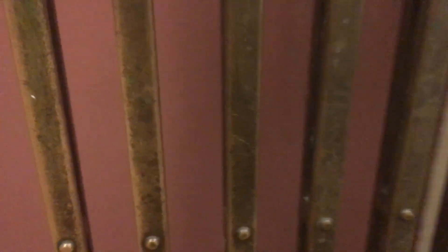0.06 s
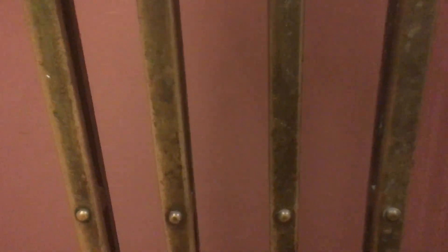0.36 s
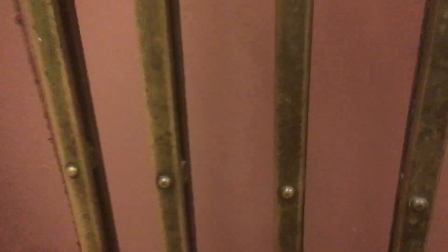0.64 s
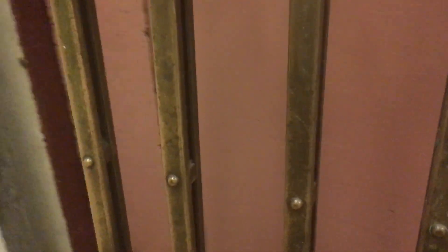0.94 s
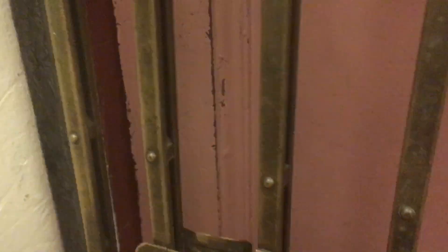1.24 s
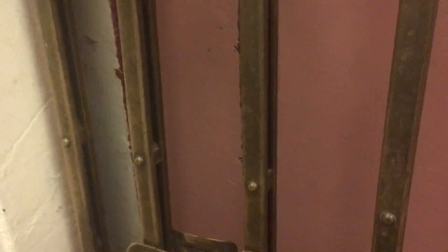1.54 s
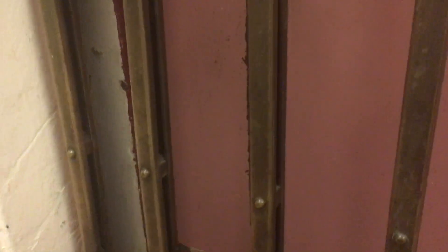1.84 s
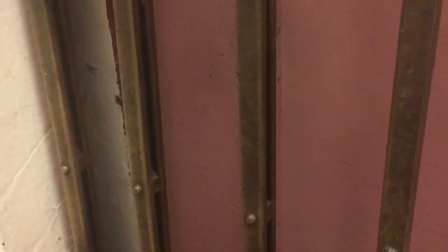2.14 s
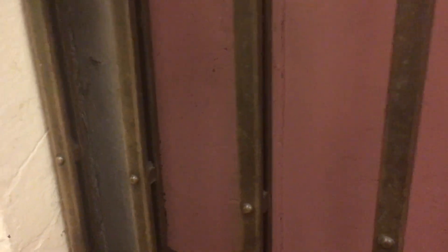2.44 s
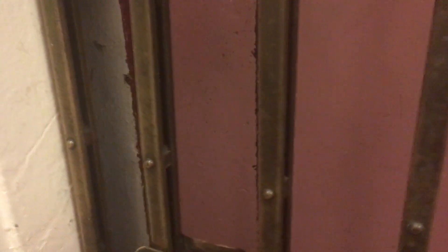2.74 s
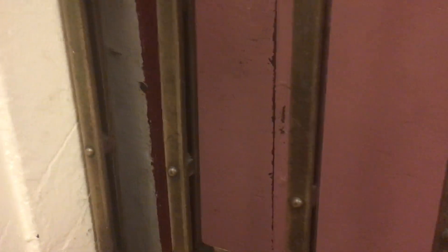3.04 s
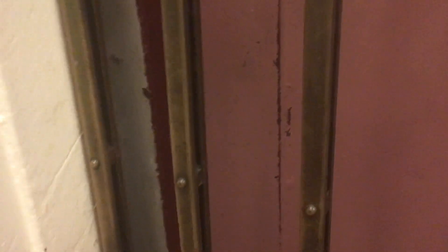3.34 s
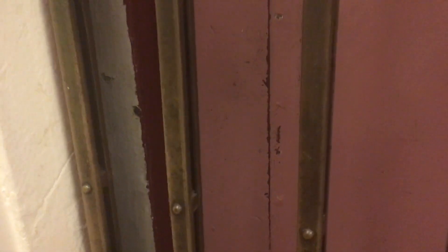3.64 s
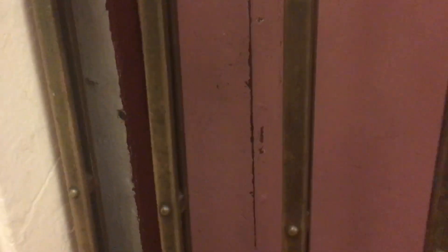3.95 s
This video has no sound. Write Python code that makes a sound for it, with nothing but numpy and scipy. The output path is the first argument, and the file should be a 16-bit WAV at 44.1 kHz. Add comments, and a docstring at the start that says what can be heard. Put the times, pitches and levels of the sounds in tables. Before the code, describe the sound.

A folding metal elevator gate rumbles and scrapes along, then its loose bars knock and click.

```python
"""Folding metal gate in a lift

The gate rolls and scrapes along its track, shaking the frame into a low rumble with a few jolts.
Dry pivots squeak and the track gives one thin squeal. As the gate comes to rest, its loose bars
go on knocking and the rivets and catch click; the small cab rings briefly after each contact."""
import sys
import numpy as np
from scipy import signal
from scipy.fft import rfft, irfft
from scipy.io import wavfile
from scipy.ndimage import uniform_filter1d

SR = 44100
rng = np.random.default_rng(int(sys.argv[2]) if len(sys.argv) > 2 else 0)


def digitize_waveform(pressure):
    """Quantize a signal to 16-bit integers and store it at the path in sys.argv[1].

    Rows of a 2-D input are taken as channels; values are limited to [-1, 1].
    """
    field = np.atleast_2d(pressure).T
    bounded = np.clip(field, -1, 1)
    quanta = np.round(bounded * 32767).astype(np.int16)
    wavfile.write(sys.argv[1], SR, quanta)


N = 176400
HIT_SAMPLES = 22050  # half a second for each hit to ring out

# Levels in the tables are relative: the functions add their own gains.
# hush of the air in the cab: f/Hz, level/dB
AIR_SPECTRUM = [(300, 6.5), (700, -6), (1500, -9), (3100, -19), (7800, -27), (15500, -10)]
# time the cab's echo takes to fade by 60 dB: f/Hz, t/s
CAB_DECAY = [(300, 0.59), (800, 0.33), (2100, 0.27), (5500, 0.19), (14600, .16)]
# low resonances of cab and gate frame: f/Hz, width/Hz, level/dB
FRAME_MODES = [(43.3, 3.1, -3.5), (63.7, 7.7, 3), (92.1, 7.8, 0), (118.3, 28, -5.5), (161.9, 11, -1.5),
               (187.7, 6.8, -3.5), (216.6, 6.6, -12.5), (245.2, 15, -15.5), (334.3, 11, -20.5),
               (424, 7.8, -25), (530, 37, -30.5)]
# strength of the rumble: t/s, level/dB
RUMBLE_LEVEL = [(0, -38), (.27, -38), (.53, -42.5), (.66, -36), (.8, -34.5), (.99, -41.5), (1.32, -37),
                (1.6, -43.5), (1.87, -50.5), (2.6, -48), (3.3, -53.5), (3.75, -49.5), (4, -57)]
# bumps on the track: t/s, level/dB, f/Hz that the push favours
JOLTS = [(0.634, -27.5, 192), (0.687, -30.5, 163), (.745, -30, 78), (1.224, -44.5, 406),
         (2.336, -46.5, 138), (2.996, -47, 440), (3.667, -49.5, 260)]
# strength of the scraping: t/s, level/dB
SCRAPE_LEVEL = [(0, -46.5), (.16, -43.5), (.28, -49), (.6, -50.5), (.69, -40), (.74, -45.5), (.84, -51.5),
                (.93, -51), (1.03, -48), (1.08, -52.5), (1.22, -45), (1.36, -50.5), (1.48, -58.5),
                (1.62, -53.5), (1.72, -62.5), (1.8, -73.5), (4, -69.5)]
# tone colour of the scraping: f/Hz, level/dB
SCRAPE_SPECTRUM = [(250, 3.5), (480, -14), (660, -13), (850, -17), (1200, -14.5), (2500, -16), (5800, -17),
                   (8500, -21), (12000, -16), (15500, -15)]
# pivot squeaks: t/s, length/s, start f/Hz, end f/Hz, level/dB, loss per harmonic/dB
SQUEAKS = [(0.302, 0.026, 5370, 5400, -47, 27), (0.308, 0.023, 2594, 2532, -40.5, 15),
           (0.32, 0.0267, 2526, 2440, -45.5, -1), (0.324, 0.026, 2763, 2626, -43.5, 10),
           (0.336, 0.026, 4940, 4600, -49, 24), (0.842, 0.056, 3360, 3590, -55, 22),
           (1.091, 0.04, 2505, 2470, -54, 20), (1.349, 0.078, 2417, 2840, -54, 5.5)]
# notes the bars ring with: f/Hz, level/dB, t/s to fade by 60 dB
BAR_MODES = [(344, -9.5, 0.45), (526.4, -12.5, 0.56), (678, -9, 0.24), (1047, -14, 0.3), (1202, -3.5, 0.25),
             (1817, -10.5, 0.2), (2170, -15, 0.12), (2840, -15.5, 0.088), (3095, -13, 0.12),
             (3560, -20, 0.11), (4470, -7.5, 0.078), (5400, -9, 0.086), (6170, -4.5, 0.036),
             (6830, -1.5, 0.035)]
# contacts that land where one of those notes swings most: t/s, f/Hz
SWEET_SPOTS = [(.661, 6121), (2.429, 2099), (2.608, 2835), (3.448, 4540), (3.5175, 4540)]
# borders of five bands, named body, clack, ring, edge and sizzle from low to high: f/Hz
BAND_EDGES = [250, 900, 2400, 4800, 7500, 16000]
# light ticks of slack links: t/s, level/dB
LINK_TICKS = [(.068, -46), (.834, -47.5), (.904, -50.5), (1.019, -52), (1.159, -61), (1.516, -52.5),
              (1.82, -69.5), (1.873, -64.5), (1.9413, -62.5), (2.209, -65), (2.263, -52.5), (2.301, -55),
              (2.512, -56.5), (2.998, -60), (3.373, -50.5)]
# tone colour of those ticks: level/dB in each of the five bands
TICK_COLOUR = [-20, -18, -1.5, -7, -1.5]
# sharp clicks of rivets and catch: t/s, then level/dB in each of the five bands
RIVET_CLICKS = [(0.495, -69, -49.5, -48, -50, -43.5), (0.631, -56, -41.5, -42, -40.5, -40),
                (0.661, -75.5, -69, -40.5, -36.5, -31), (0.761, -78, -58, -46, -49, -38),
                (1.226, -38.5, -44, -45, -43.5, -43.5), (1.605, -56, -62, -53, -54.5, -42),
                (1.651, -60, -55.5, -57, -48.5, -48), (1.704, -56, -55, -52.5, -55.5, -47),
                (2.024, -59, -67, -58.5, -52, -52), (2.338, -55.5, -52, -52, -54, -51),
                (2.345, -50.5, -54, -48, -52, -44), (2.476, -56.5, -60, -48, -60, -54.5),
                (2.608, -46.5, -43, -36.5, -45, -47), (3.5175, -104, -62.5, -45, -39.5, -34.5),
                (3.598, -75, -66, -51, -48.5, -55)]
# duller knocks of bar on bar: t/s, then level/dB in each of the lower four bands
BAR_KNOCKS = [(0.413, -56.5, -44, -39.5, -47.5), (0.638, -56, -44, -67, -65), (1.245, -41.5, -58, -63, -50),
              (1.428, -51.5, -45.5, -40, -49), (1.59, -53, -53.5, -68, -67), (1.79, -53.5, -72, -89, -85),
              (1.965, -56, -60, -73, -88), (1.987, -53.5, -53.5, -52, -68), (2.006, -58.5, -60.5, -60, -68),
              (2.278, -59, -55.5, -60, -57.5), (2.428, -50, -37, -45.5, -45.5),
              (2.558, -56, -48, -49.5, -59), (2.681, -54.5, -68, -52.5, -59.5),
              (2.961, -60, -60.5, -71, -70), (2.990, -51, -59, -62, -78), (3.192, -56, -55.5, -56.5, -74),
              (3.415, -58, -58, -66, -69), (3.448, -56.5, -61, -47, -48), (3.666, -51.5, -60, -60, -63),
              (3.696, -56, -55, -60, -70)]


def from_db(db):
    """Turn decibels into a gain."""
    return 10 ** (np.asarray(db) / 20)


def rms_one(x):
    """Scale a signal so its average strength (rms) is 1."""
    return x / np.sqrt(np.mean(x ** 2) + 1e-20)


def in_time(rows):
    """Join (time, value) rows by straight lines."""
    return np.interp(np.arange(N) / SR, *np.transpose(rows))


def at_hz(points, hz):
    """Read between (frequency, value) rows, with octaves evenly spaced."""
    f, value = np.transpose(points)
    return np.interp(np.log(np.maximum(hz, 1)), np.log(f), value)


def add(out, start_s, sound):
    """Mix a sound in at a given time."""
    i = max(int(start_s * SR), 0)
    out[i:i + len(sound)] += sound[:max(N - i, 0)]


def wander(shape, samples):
    """A random wiggle; smoothing over more samples makes it slower."""
    return rms_one(uniform_filter1d(rng.standard_normal(shape), size=samples))


def band_pass(x, low_hz, high_hz):
    """Keep what lies between two frequencies."""
    return signal.sosfilt(signal.butter(2, [low_hz, high_hz], "band", fs=SR, output="sos"), x)


def coloured(noise, spectrum):
    """Give a noise a tone colour and take out the bass."""
    gains = from_db(at_hz(spectrum, np.arange(N // 2 + 1) * SR / N))
    return rms_one(band_pass(irfft(rfft(noise) * gains, N), 250, 16000))


def resonate(x, hz, width_hz):
    """Ring at one pitch; the narrower the width, the longer the ring."""
    r = np.exp(-np.pi * width_hz / SR)
    feedback = [1, -2 * r * np.cos(2 * np.pi * hz / SR), r * r]
    return signal.lfilter(np.array([1, 0, -1]) * (1 - r * r) / 2, feedback, x)


def cab_air(level_db):
    """The air in the cab is a faint, steady hush."""
    return from_db(level_db) * coloured(rng.standard_normal(N), AIR_SPECTRUM)


def cab_echo(x, echo_db):
    """The close walls add a short wash of reflections."""
    t = np.arange(HIT_SAMPLES) / SR
    echo = rng.standard_normal(len(t)) * from_db(-60 * t / at_hz(CAB_DECAY, 7500)) * (t > .003)
    return x + from_db(echo_db) * signal.fftconvolve(x, echo / np.linalg.norm(echo))[:N]


def wall_panel(x):
    """A wall panel picks up the sound and hums along."""
    return x + from_db(2.5) * resonate(x, hz=654.5, width_hz=22)


def frame_ring(force, hz, width_hz):
    """One low resonance of the frame, filtered twice to keep it narrow."""
    return rms_one(resonate(resonate(force, hz, width_hz), hz, hz / 3))


def rumble(level_db, tilt_per_octave):
    """Rolling shakes the frame; its upper resonances die away first as the gate slows."""
    effort_db, out = in_time(RUMBLE_LEVEL), 0
    for hz, width, db in FRAME_MODES:
        shake = frame_ring(rng.standard_normal(N + SR), hz, width)[SR:]  # skip the build-up
        shake /= np.sqrt(uniform_filter1d(shake ** 2, size=12000))  # even out slow swells
        octaves = np.log2(hz / FRAME_MODES[1][0])
        tilt_db = tilt_per_octave * octaves * (effort_db - RUMBLE_LEVEL[0][1])
        out = out + from_db(db + tilt_db) * shake
    low_cut = signal.butter(2, 32, "high", fs=SR, output="sos")
    return from_db(effort_db + level_db) * signal.sosfilt(low_cut, out)


def jolts(push_s, level_db, octave_loss_db=8.5):
    """A bump on the track pushes the frame for a moment and lets it boom."""
    out, t = np.zeros(N), np.arange(HIT_SAMPLES) / SR
    for start_s, db, push_hz in JOLTS:
        boom = 0
        for hz, width, mode_db in FRAME_MODES:
            ring = frame_ring(rng.standard_normal(len(t)) * np.exp(-t / push_s), hz, width)
            boom = boom + ring * from_db(mode_db - octave_loss_db * np.log2(hz / push_hz) ** 2)
        add(out, start_s, from_db(db + level_db) * boom / np.std(boom[:SR // 10]))
    return out


def track_squeal(level_db, hz=15200, start_s=.68, end_s=.92):
    """The track gives a thin, flickering squeal that swells and fades."""
    squeal = resonate(resonate(rng.standard_normal(N), hz, 450), hz, 450)
    flicker = from_db(4 * wander(N, 400))
    progress = np.clip((np.arange(N) / SR - start_s) / (end_s - start_s), 0, 1)
    return from_db(level_db) * np.sin(np.pi * progress) * rms_one(squeal * flicker)


def scraping(grains_per_s=1800, ticks_per_s_each=5.9):
    """The gate slides over the track in countless tiny contacts; some set a bar ringing."""
    sizes = from_db(2.2 * np.minimum(rng.exponential(1, N), 5)) * rng.choice([-1, 1], N)
    grains = sizes * (rng.random(N) < grains_per_s / SR)
    chatter = from_db(2.76 * wander(N, 600))
    scrape = coloured(cab_echo(grains * chatter, echo_db=-3), SCRAPE_SPECTRUM)
    scrape += from_db(-6) * resonate(scrape, hz=5550, width_hz=200)  # the track rings faintly
    ticks = 0
    for hz in np.exp(rng.uniform(np.log(1000), np.log(15000), 60)):
        taps = sizes * (rng.random(N) < ticks_per_s_each / SR)
        ticks = ticks + rms_one(resonate(taps + 1e-18, hz, width_hz=57))
    return from_db(in_time(SCRAPE_LEVEL)) * (scrape + from_db(-15) * rms_one(ticks))


def pivot_squeaks(level_db, top_hz=15700):
    """A dry pivot sticks and slips: a wavering whistle that rasps as the grip flutters."""
    out = np.zeros(N)
    for start_s, length_s, start_hz, end_hz, db, loss_db in SQUEAKS:
        progress = np.linspace(0, 1, int(length_s * SR))
        wobble, grip = wander((2, HIT_SAMPLES), 70)[:, :len(progress)]
        pitch = (start_hz + (end_hz - start_hz) * progress) * (1 + .009 * wobble)
        phase, tone = 2 * np.pi * np.cumsum(pitch) / SR, 0
        for k in range(max(int(top_hz / start_hz), 1)):
            flutter = rms_one(resonate(rng.standard_normal(len(progress)), hz=300, width_hz=400))
            rasp = .42 * min(k + 1, 2)
            harmonic = from_db(-loss_db * k) * np.sin((k + 1) * phase)
            tone = tone + harmonic * (1 + rasp * flutter) / np.hypot(1, rasp)
        add(out, start_s, from_db(db + level_db + 1.1 * grip) * np.sin(np.pi * progress) * tone)
    return cab_echo(out, echo_db=-3.5)


def gate_overtones(noise, spread_db=4.2):
    """The gate's many close overtones: narrow peaks and gaps pressed into a noise."""
    peaks = signal.fftconvolve(rng.standard_normal(HIT_SAMPLES // 2 + 1), np.hanning(50), "same")
    return irfft(rfft(noise) * from_db(spread_db * np.clip(rms_one(peaks), -2, 2)), HIT_SAMPLES)


def sweet_spot(times, hz):
    """1 for each contact that lands where this note swings most, 0 for the others."""
    return sum((abs(times - s) < .004) * (abs(np.log(hz / f)) < .06) for s, f in SWEET_SPOTS)[:, None]


def strength(rows, hz, width_hz):
    """How strongly each contact sounds in a band around one frequency."""
    edges = np.array(BAND_EDGES)
    centres = np.sqrt(edges[1:] * edges[:-1])
    db_per_hz = rows[:, 1:] - 10 * np.log10(np.diff(edges))
    levels_db = [np.interp(np.log(hz), np.log(centres), row) for row in db_per_hz]
    return from_db(levels_db)[:, None] * np.sqrt(width_hz)


def contacts(rows, crack_s, rise_s, echo_db, ring_db, level_db):
    """Metal hits metal: a short crack, an echo that dies band by band, and ringing bars."""
    rows, t = np.array(rows), np.arange(HIT_SAMPLES) / SR
    times = rows[:, 0]
    noise = rng.standard_normal((len(rows), 3, len(t)))
    flicker = from_db(2.5 * rms_one(uniform_filter1d(noise[:, 2], size=60)) * np.exp(-t / 0.054))
    metal = gate_overtones(noise[:, :2])
    bands, sounds = np.geomspace(250, 16500, 15), 0
    for k, (low, high) in enumerate(zip(bands, bands[1:])):
        hz = np.sqrt(low * high)
        tail = from_db(echo_db - 60 * t / at_hz(CAB_DECAY, hz))
        envelope = np.hypot(np.exp(-t / crack_s), tail) * (1 - np.exp(-t / rise_s))
        burst = metal[:, k % 2] * flicker * envelope  # next-door bands use separate noises
        burst /= np.sqrt(np.mean(burst[:, t < .02] ** 2, axis=1, keepdims=True))
        sounds = sounds + strength(rows, hz, SR / 2) * band_pass(burst, low, high)
    for hz, db, fade_s in BAR_MODES:
        scatter_db = rng.normal(0, 2.5, (len(rows), 1))
        force = from_db(db + ring_db + 12 * sweet_spot(times, hz) + scatter_db)
        detune = 1 + rng.normal(0, 0.0083, (len(rows), 1))
        ring = np.sin(2 * np.pi * hz * detune * t) * from_db(-60 * t / fade_s)
        sounds = sounds + strength(rows, hz, hz / 2) * force * ring
    out = np.zeros(N)
    for start_s, sound in zip(times, sounds):
        add(out, start_s, sound)
    return from_db(level_db) * out


def rivet_clicks():
    """Rivets, catch and slack links make quick, bright contacts."""
    rows = RIVET_CLICKS + [(s, *(db + np.array(TICK_COLOUR))) for s, db in LINK_TICKS]
    return contacts(rows, crack_s=.0024, rise_s=.00087, echo_db=-8, ring_db=5.5, level_db=-3.5)


def bar_knocks():
    """Loose bars bump each other with a softer start and less treble."""
    rows = [(*row, row[-1] - 19.5) for row in BAR_KNOCKS]  # sizzle band: 19.5 dB below the edge band
    return contacts(rows, crack_s=.0022, rise_s=.0022, echo_db=-13, ring_db=3.5, level_db=-3)


def scene():
    """Add up the gate and the air, and let the wall panel hum along; one channel."""
    rattle = rivet_clicks() + bar_knocks()
    air = cab_air(level_db=-70)
    frame = rumble(level_db=-7.5, tilt_per_octave=0.16) + jolts(push_s=0.018, level_db=-6)
    rubbing = scraping() + track_squeal(level_db=-49.5) + pivot_squeaks(level_db=2.5)
    return wall_panel(air + frame + rubbing + rattle)[None]


def record(dry):
    """Cut the treble steeply above 15700 Hz."""
    return signal.sosfilt(signal.ellip(10, .3, 70, 15700, fs=SR, output="sos"), dry)


dry = scene()
out = record(dry)
digitize_waveform(out)
```